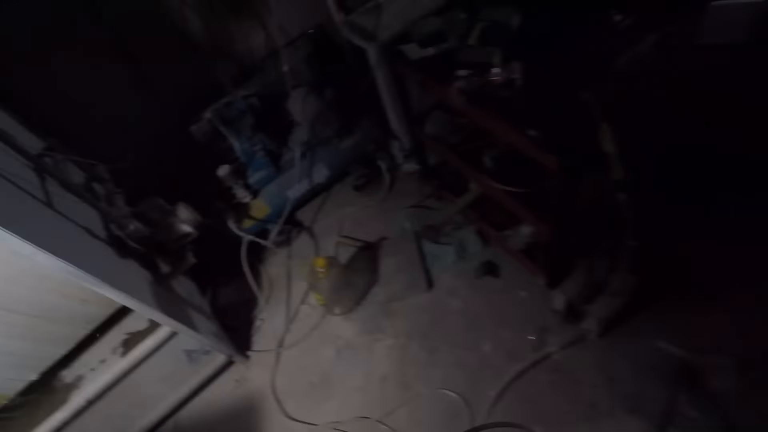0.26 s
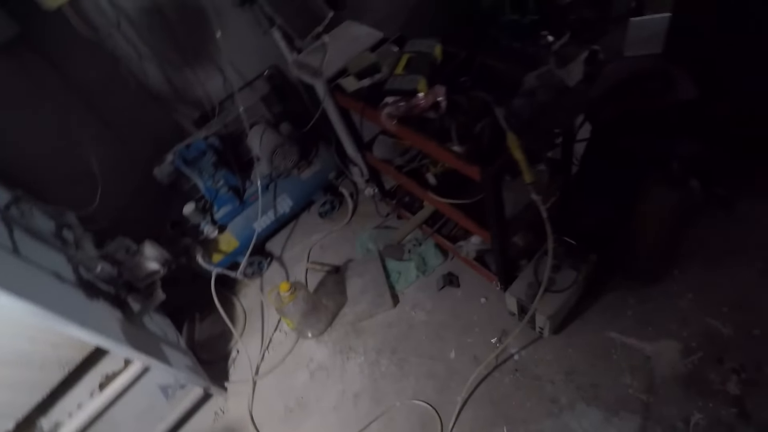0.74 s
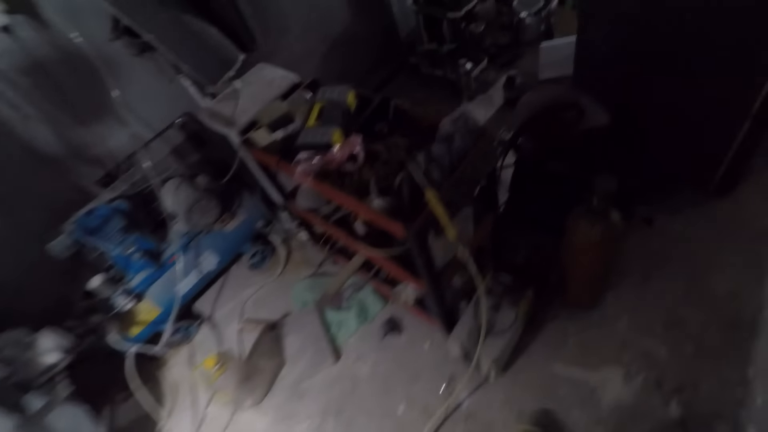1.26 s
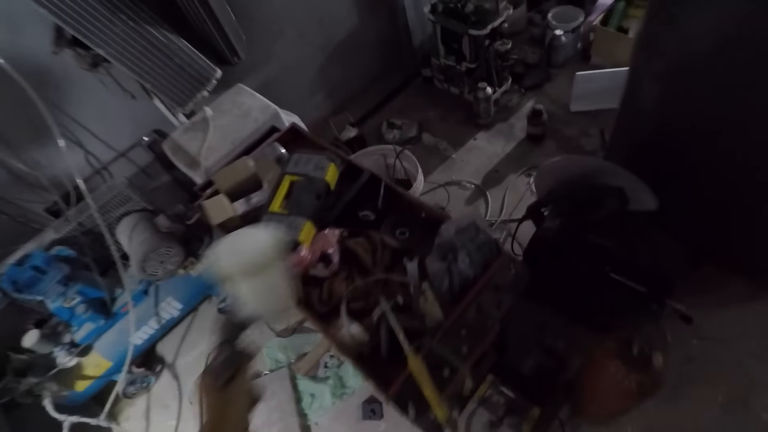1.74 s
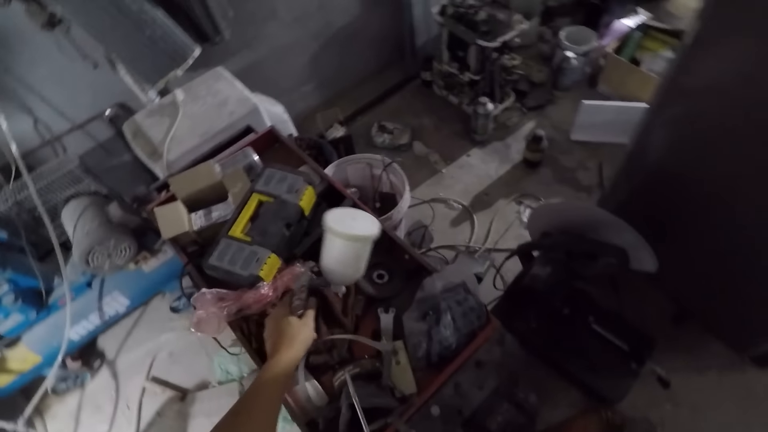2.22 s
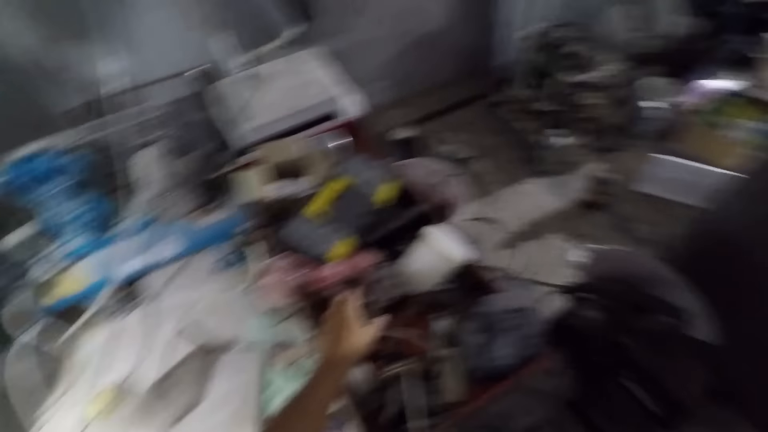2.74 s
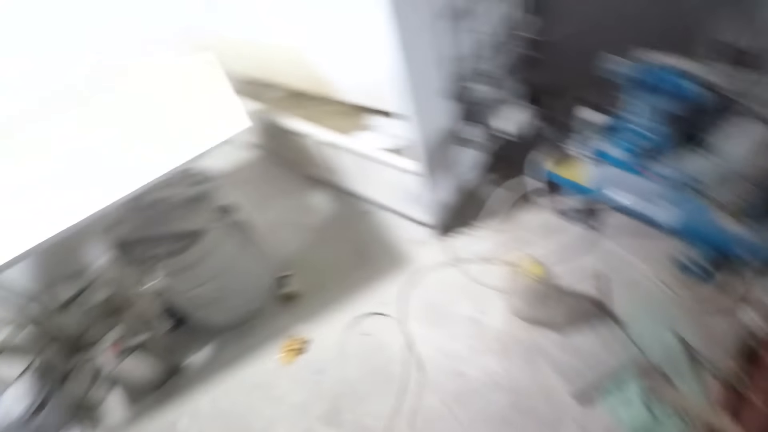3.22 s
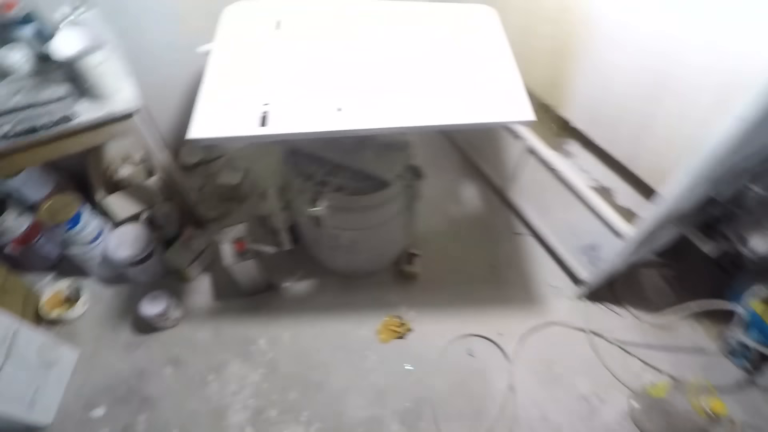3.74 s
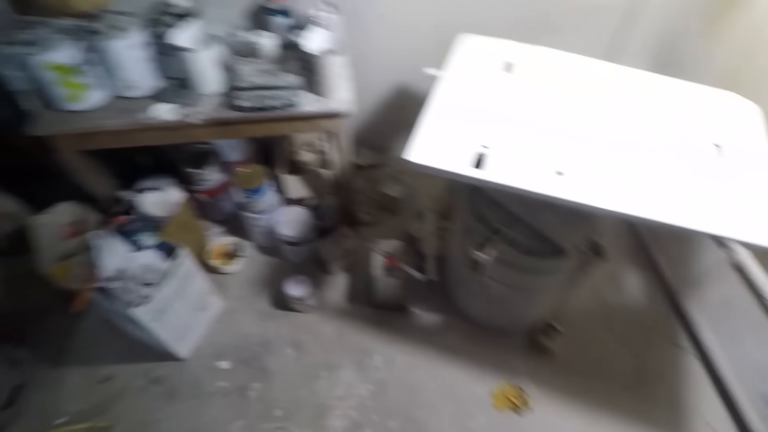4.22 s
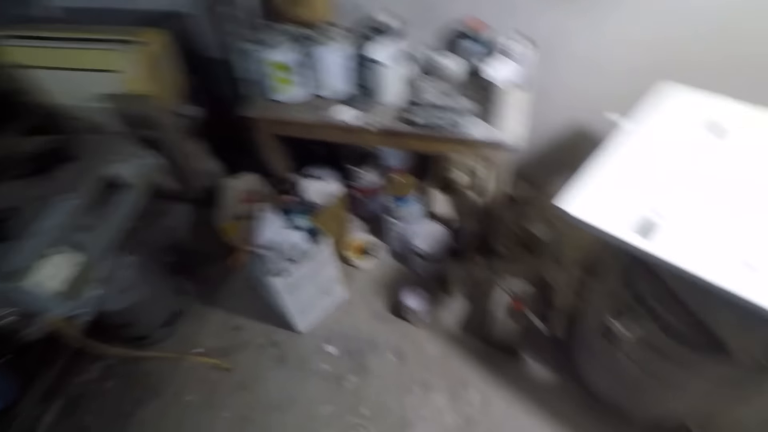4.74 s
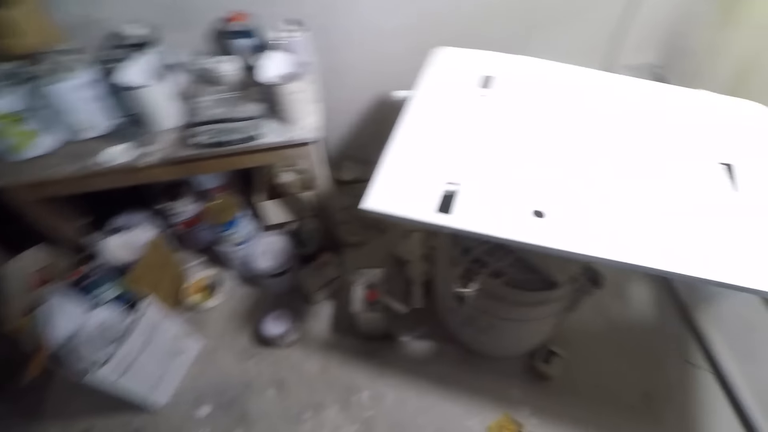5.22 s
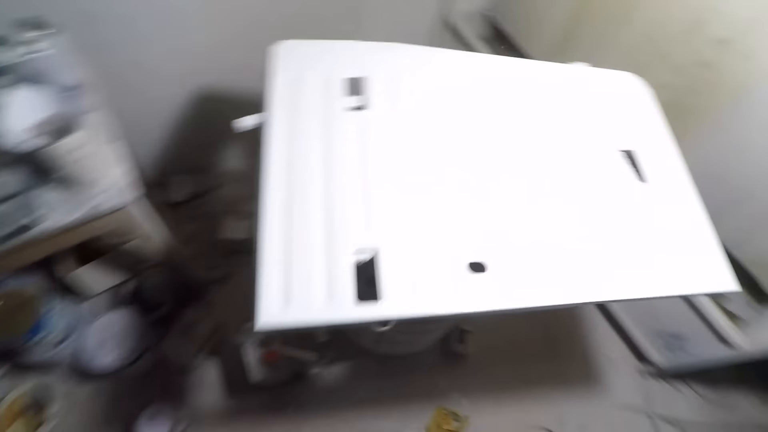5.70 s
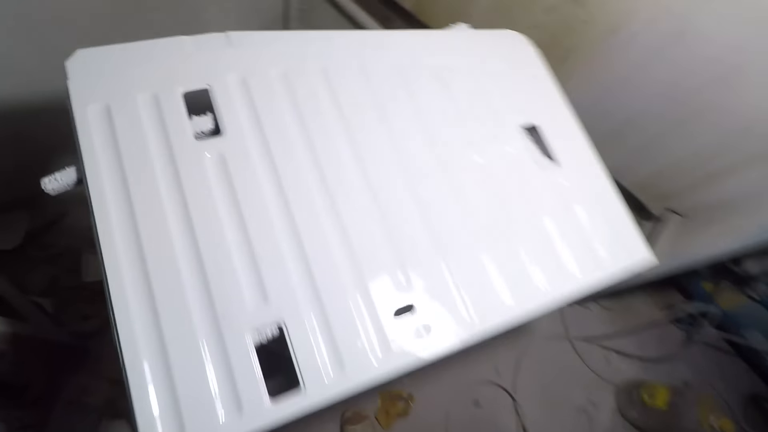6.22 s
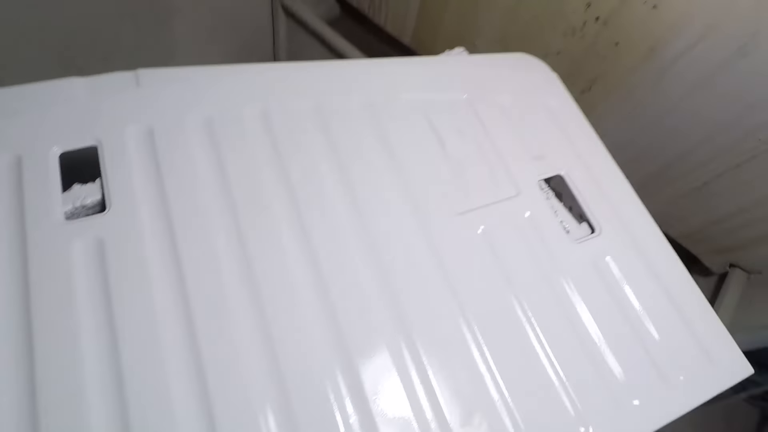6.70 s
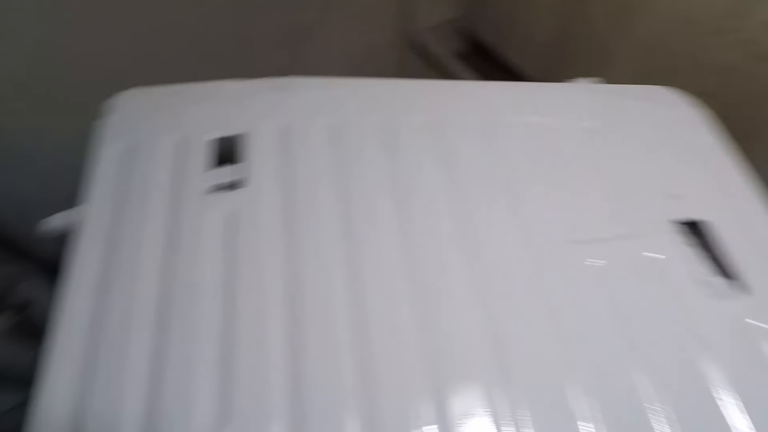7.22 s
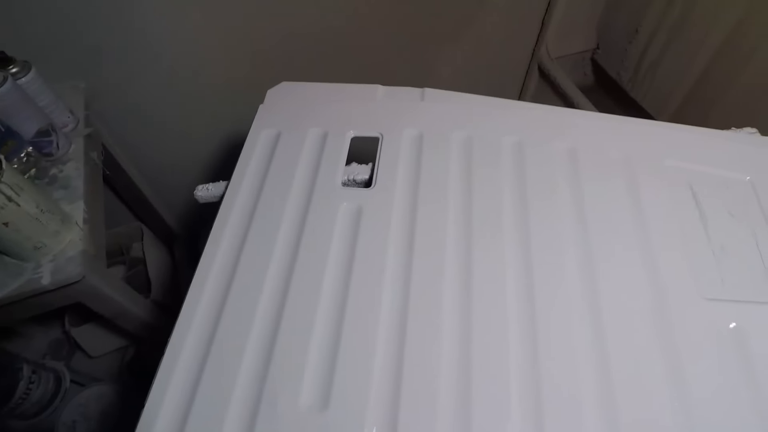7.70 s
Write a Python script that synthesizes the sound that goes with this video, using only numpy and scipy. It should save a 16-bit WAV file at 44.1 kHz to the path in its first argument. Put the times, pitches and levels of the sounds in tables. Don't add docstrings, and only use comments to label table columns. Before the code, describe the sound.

A piston air compressor is already running and continues unbroken for about eight seconds in a hard, reflective workshop. A dominant, very deep motor hum sits under a rapid pulsing drone, about seventeen strokes a second, with a hollow mid-pitched intake ring, clacking valves, thin metallic ringing and airy hiss. Brief pitch-bending swells of the ring slip in near 0.8 and 1.3 s, again around 3.5 to 3.7, and faintly near 5 and 5.75. A light tick at 1.5 s precedes hollow overlapping knocks and clatter from 1.9 to 2.2 s as a tool is set down; a faint click follows at 2.9. Bass rumble is fullest around 2 to 3 s, then thins. Shoes and hose scuff concrete throughout, most clearly from 4.7 to 5.6 s. Tones fade in and out as the moving microphone passes loud and quiet spots; after 6.6 s the upper drone is duller.

```python
import sys
import numpy as np
from scipy import signal
from scipy.io import wavfile
from scipy.ndimage import uniform_filter1d, minimum_filter1d

SR = 44100
rng = np.random.default_rng(int(sys.argv[2]) if len(sys.argv) > 2 else 0)


def file_out(sig):
    cols = np.atleast_2d(sig).T
    lim = np.clip(cols, -1, 1)
    pcm = np.round(lim * 32767).astype(np.int16)
    wavfile.write(sys.argv[1], SR, pcm)


def magnitude_from_level(level_db):
    exponent = np.asarray(level_db, float) / 20
    return 10 ** exponent


N = 351036
T = np.arange(N) / SR
PUMP_HZ = 17.215
BASS_FAR_DB, BASS_NEAR_DB = -30, -20
# time_s, hum_delay_ms, nearness to the tank corner (0-1), ring_peak_after_stroke_ms
WALK_PATH = [(0, -2.5, 0.6, 34.4), (.8, -4, 0.36, 29), (1.3, -2, 0.64, 30.7), (1.9, -1.3, 0.86, 33.7),
             (2.7, -0.4, 0.78, 36), (3.1, -1.2, 0.63, 29), (3.6, -2.5, 0.28, 27.9), (3.9, -2.5, 0.2, 29),
             (5, -3.5, 0.08, 28.1), (5.25, -3.5, 0.2, 28.7), (5.8, -2.5, 0.13, 31.4),
             (6.6, -4.5, 0.12, 31.7), (7.96, -3.5, 0.17, 36.2)]


def evened(x):
    return x / np.sqrt(np.mean(x ** 2) + 1e-20)


def curves(rows):
    s, *columns = np.transpose(rows)
    return [np.interp(T, s, c) for c in columns]


def read(points, hz):
    f, value = np.transpose(points)
    return np.interp(np.log(hz + 1), np.log(f + 1), value)


def drift(per_s):
    coarse_t = T[::256]
    coarse = 0
    for f in per_s * np.geomspace(.1, 1, num=8):
        coarse = coarse + np.sin(2 * np.pi * (f * coarse_t + rng.random())) / np.sqrt(f)
    return np.interp(T, coarse_t, evened(coarse))


def gate(start, length, edge_s, fall_s=None):
    t = T[::64]
    rise = np.tanh((t - start) / edge_s)
    fall = np.tanh((t - start - length) / (fall_s or edge_s))
    return np.interp(T, t, (1 + rise) * (1 - fall) / 4)


def fades(rows, edge_s=0.042):
    return sum(db * gate(s, length, edge_s) for s, length, db in rows)


def noise(spectrum, patchy_db, size=1024):
    hz = np.fft.rfftfreq(size, 1 / SR)
    a, b, patches = rng.standard_normal((4 * N // size + 5, len(hz), 3)).T
    patches = uniform_filter1d(patches, size=12, axis=0)
    patches = evened(uniform_filter1d(patches, size=10, axis=1))
    inside = (hz > spectrum[0][0]) & (hz < spectrum[-1][0])
    shape_db = np.where(inside, read(spectrum, hz), -120)
    z = (a + 1j * b) * magnitude_from_level(shape_db[:, None] + patchy_db * patches)
    return evened(signal.istft(z, nperseg=size, noverlap=3 * size // 4)[1][:N])


def resonate(x, hz, width):
    b, a = signal.iirpeak(hz, hz / width, SR)
    return signal.lfilter(b, a, signal.lfilter(b, a, x))


def line(turns, db, wander_db, wander_turns):
    level = np.sqrt(2) * magnitude_from_level(db + wander_db * drift(1.548))
    return level * np.cos(2 * np.pi * (turns + wander_turns * drift(1.5)))


def workshop():
    # pitch_hz, level_db per Hz
    rumble_colour = [(20, -2), (30, -2), (60, 2.2), (100, 4.5), (170, -4), (260, 3.5), (400, -2),
                     (520, 1.5), (600, -6.5), (700, -19.5), (800, -21), (1000, -22), (1500, -24.5)]
    # pitch_hz, level_db per Hz
    hiss_colour = [(1060, -17), (1800, -1.5), (2630, -4), (3590, -6.5), (4710, -8.5), (6330, -16),
                   (6620, -20), (8970, -20), (11000, -21), (14300, -52.5), (22000, -120)]
    middle_far_db, middle_near_db = -30.5, -19.5
    near = curves(WALK_PATH)[1]
    bass_db = BASS_FAR_DB + (BASS_NEAR_DB - BASS_FAR_DB) * near
    middle_db = middle_far_db + (middle_near_db - middle_far_db) * near
    rumble = noise(rumble_colour, 1.3, size=2048)
    bass, up_to_middle = (signal.sosfiltfilt(signal.butter(3, hz, fs=SR, output="sos"), rumble)
                          for hz in (128, 340))
    rumble += (magnitude_from_level(bass_db + 26.5) - 1) * bass
    rumble += (magnitude_from_level(middle_db + 22.5) - 1) * (up_to_middle - bass)
    throb = 1 + 0.047 * np.cos(2 * np.pi * PUMP_HZ * (T - .03))
    return magnitude_from_level(-24.0) * throb * rumble + magnitude_from_level(-46.0) * noise(hiss_colour, 1.4)


def scuffs():
    # start_s, length_s, level_db
    strokes = [(0.086, 0.19, -42), (0.714, 1, -46.5), (1.438, .12, -39), (1.884, 0.16, -40),
               (2.087, 0.078, -46), (2.198, 0.033, -38.5), (2.619, 0.51, -41), (3.08, 0.23, -39),
               (3.923, 1, -41.5), (4.7, 0.19, -33), (4.893, 0.36, -35), (5.308, 0.34, -34.5),
               (5.668, 0.26, -45), (6.538, 0.54, -43.5), (7.356, 0.21, -41.5), (7.68, 0.49, -42)]
    # pitch_hz, level_db per Hz
    rub_colour = [(760, -31.5), (1300, -3), (1960, -4.5), (3260, -0.5), (4080, -5.5), (5680, -7.5),
                  (6970, -20), (8960, -21.5), (11000, -32.5), (14300, -66.5), (22000, -120)]
    shuffle_db = -47.5
    unevenness = np.minimum(rng.exponential(1, N // 40 + 1), 4).repeat(40)[:N]
    grit = rng.standard_normal(N) * magnitude_from_level(4.6 * unevenness)
    grain = uniform_filter1d(abs(grit), size=60)
    power = magnitude_from_level(2 * shuffle_db)
    for s, length, db in strokes:
        power = power + magnitude_from_level(2 * db) * gate(s, length, 0.13 * length, .25 * length)
    return np.sqrt(power) * evened(noise(rub_colour, 1.1) * (1 + 0.44 * evened(grain)))


def knocks():
    # time_s, thud_db, thud_hz, thud_width (fading per second), clatter_db
    hits = [(1.451, -28, 700, 201, -36.5), (1.5, -43, 1100, 200, -32), (1.885, -8.5, 391, 39.6, -40.5),
            (1.91, -9, 291, 38.8, -32.5), (1.955, -17, 600, 59, -37), (2.0, -35, 760, 100, -35.5),
            (2.04, -23.5, 377, 60, -37), (1.93, -20, 228, 60, -32.5), (2.095, -11.5, 332, 40.2, -27),
            (2.151, -18, 294, 40, -37.5), (2.2, -27, 610, 100, -46), (2.93, -37, 880, 200, -33.5)]
    out, t = np.zeros(N), T[:6000]
    for s, thud_db, hz, width, clatter_db in hits:
        burst, clatter = rng.standard_normal((2, len(t)))
        thud = np.sin(2 * np.pi * hz * t) * np.exp(-t * width) * (1 - np.exp(-t / 0.0033))
        tail = np.exp(-t / .05) * (1 - np.exp(-t / .003))
        thud += .5 * evened(resonate(burst, hz, 6 * width)) * tail
        clatter = evened(resonate(clatter, 980, 1200) + 0.26 * resonate(clatter, 2800, 3100))
        clatter *= np.exp(-t / 0.006)
        out[round(s * SR):][:len(t)] += magnitude_from_level(thud_db) * thud + magnitude_from_level(clatter_db) * clatter
    return out


def valves():
    # pitch_hz, width_hz, delay after the stroke_s, loose rattle share, pair_half_split_hz
    plates = [
        (1120, 150, .019, 1.5, 50),
        (1620, 170, .013, .5, 70),
        (1600, 120, .013, .3, 0),
    ]
    # pitch_hz, width_hz, level_db
    thin_parts = [(4744, 16, -58.5), (8870, 30, -69), (12170, 40, -69), (923, 13, -55.5), (679, 6, -53)]
    # pitch_hz, level_db per Hz
    reed_colour = [(6650, -46), (11300, -2.5), (11700, -0.5), (12500, 3), (13100, -4.5), (14100, -6.5),
                   (15000, -13.5)]
    facing = {"low": [(-.3, 1.3, -6.5), (3.95, 2, 3), (6.2, 1.3, -2.5), (7.1, 1.2, 3.5)],
              "high": [(-.3, 1.6, 4.5), (2.85, 0.76, 4.5), (3.9, 0.74, 2)], "cover": [(-.3, 0.99, -5),
              (2.95, .65, 11), (3.8, 1.2, -7.5), (5, 0.31, 3)], "reed": [(2.9, 2.9, 2.5)],
              "low rings": [(.5, 0.77, 3.5), (1.4, .5, -2.5), (4.7, 3.6, -1.5)], "rings": [(.7, 1.1, 3),
              (2.1, .7, 5.5), (3.4, 2, -1), (5.9, 2.2, -3)]}
    turn_db = {part: fades(rows, .1) for part, rows in facing.items()}
    plates_db = (-46.5 + turn_db["low"], -49 + turn_db["high"], -53.5 + turn_db["cover"])
    reed_db = -55.5 + turn_db["reed"]
    out = np.zeros(N)
    for (hz, width, delay, loose, split), db in zip(plates, plates_db):
        turns = (T - delay) * PUMP_HZ
        swell = np.exp(-(((turns + .5) % 1 - .5) / .18) ** 2)
        ring = 0
        for f in (hz - split, hz + split):
            locked = round(f / PUMP_HZ) * turns
            ring = ring + magnitude_from_level(0.84 * drift(0.55)) * np.cos(2 * np.pi * (locked + 0.27 * drift(1)))
        rattle = evened(resonate(rng.standard_normal(N), hz, width))
        out += magnitude_from_level(db - 1.5) * evened(swell * ring + loose * (.6 * swell + .5) * rattle)
    since = ((T - .025) * PUMP_HZ) % 1
    strength = magnitude_from_level(2.5 * rng.standard_normal(200))[(T * PUMP_HZ + .5).astype(int)]
    puff = 0.69 + 1.9 * strength * since / 0.19 * np.exp(-since / .15)
    for hz, width, db in thin_parts:
        ring_db = db + turn_db["rings" if hz > 6000 else "low rings"] + 1.2 * drift(3.1)
        ring = evened(resonate(rng.standard_normal(N), hz, width))
        out += magnitude_from_level(ring_db) * np.sqrt(puff) * ring
    return out + magnitude_from_level(reed_db) * evened(puff * noise(reed_colour, 1.2))


def slips():
    # middle_s, level_db, top_hz
    skips = [(.785, -20, 599), (1.286, -21.5, 586), (3.491, -26, 560), (3.73, -23, 575), (5.031, -30, 634),
             (5.75, -25, 554)]
    out, from_hz = np.zeros(N), 380
    for s, db, top_hz in skips:
        arch = np.exp(-((T - s) / 0.0211) ** 2)
        turns = np.cumsum(from_hz + (top_hz - from_hz) * arch) / SR
        out += magnitude_from_level(db) * np.sqrt(2) * arch * np.cos(2 * np.pi * turns)
    return out


def pump():
    # multiple of the stroke rate, level_db
    low_orders = [(1, -45.5), (2, -36.5), (3, -41.8), (4, -35.4), (5, -47.0), (6, -29.8), (7, -35.3),
                  (8, -35.1), (9, -37.1), (10, -44.9), (11, -33.9), (12, -42.0), (13, -38.1), (14, -39.9),
                  (15, -38.8), (16, -40.5)]
    # pitch_hz, level_db
    intake_ring = [(344, -47), (396, -39), (430, -37.5), (448, -31.5), (465, -29.5), (482, -39.5),
                   (499, -23), (516, -20.5), (534, -29), (551, -28.5), (568, -48), (603, -55.5), (637, -45),
                   (689, -62.5)]
    spots = {"26": [(-.3, 1.47, 4.5), (1.3, 1.2, 0), (3.5, 0.79, 4), (5.5, .5, 0)], "28": [(.2, 0.98, -7),
             (1.3, 0.53, 4), (3.6, 4.7, 6), (5.4, 0.44, -14), (6.2, 2.1, 6.5)], "29": [(.3, 0.57, -1.5),
             (1.2, 0.53, 3), (1.72, .2, -21), (2.95, 0.27, -4.5), (3.9, 0.96, 0), (5, 0.84, -1),
             (6.9, 0.32, -4.5)], "30": [(-.3, 1.06, 3), (.79, 0.48, -10), (1.6, 1.42, 4.5),
             (3.5, 0.15, -1.5), (5, 0.65, -7.5)], "31": [(-.3, 1.56, 5.5), (1.35, .3, -24),
             (2.5, 0.64, -19), (3.75, 0.29, 6.5), (5.15, 0.49, -18)], "32": [(1.2, 0.15, 1),
             (2.85, 0.47, 6), (5.05, 0.39, -5)]}
    # start_s, length_s, change_db
    panel = [(6.62, 1.7, -14)]
    # start_s, length_s
    rebounds = [(0.793, 0.483), (3.488, 0.206), (5.12, 0.444)]
    # start_s, length_s
    echo = (1.4, .42)
    _, near, peak_ms = curves(WALK_PATH)
    bass_db = BASS_FAR_DB + (BASS_NEAR_DB - BASS_FAR_DB) * near + 24.5
    passing_db = {name: fades(rows) for name, rows in spots.items()}
    shadow_db = fades(panel, 0.18)
    split = sum(gate(s, length, .015) for s, length in rebounds)
    merge = gate(*echo, .06)
    out = np.zeros(N)
    for k, db in low_orders:
        order_db = db + 1.1 * bass_db * (2 < k < 10)
        out += line(round(k) * PUMP_HZ * T + rng.random(), order_db, 2.37, 0.03)
    for k in range(17, 41):
        if k == 27:
            continue
        fade_db = passing_db[str(min(max(k, 26), 32))] + shadow_db * (k > 29)
        slack = np.clip((abs(k - 29.5) - 1.5) / 7, 0, .7)
        turns = PUMP_HZ * (k * T - (k - 30) * peak_ms / 1000)
        turns += .055 * (k - 30) - np.arctan((k - 29.7) / 1.4) / (3 * np.pi)
        turns += .5 * (np.sinc(.4 * (k - 29.7)) < 0)
        turns -= split * np.clip((k - 29) / 4, 0, .5)
        turns += .3 * merge * (k == 30)
        turns += slack * rng.uniform(-.5, .5)
        out += line(turns, read(intake_ring, k * PUMP_HZ) + fade_db, 4.85 * slack, 0.38 * slack)
    return out


def motor():
    # multiple of the shaft rate, level_db
    shaft_orders = [(2, -40), (2.5, -45), (3, -38), (3.5, -37), (4, -41), (4.5, -40), (5, -31),
                    (5.5, -47.5), (6, -40), (7, -40.5), (9, -46.5), (10, -26.5), (15, -47)]
    shaft_spots = {"2": [(5.8, 2.1, 9)], "5": [(4.7, 1.2, 3)], "10": [(-.3, 1.18, -6.5), (1.6, 1.43, -10.5),
                   (3.3, .3, -11)], "15": [(-.3, 5.4, -7), (3.3, 1.8, 9.5), (6, 2.1, -1)]}
    shaft_hz = 46.57
    hum_far_db, hum_near_db = -9.5, -12
    delay_ms, near, _ = curves(WALK_PATH)
    turns = shaft_hz * (T - delay_ms / 1000)
    hum_db = hum_far_db + (hum_near_db - hum_far_db) * near
    out = np.sqrt(2) * magnitude_from_level(hum_db) * np.cos(2 * np.pi * turns)
    spot_db = {name: fades(rows, 0.12) for name, rows in shaft_spots.items()}
    for k, db in shaft_orders:
        out += line(k * turns + rng.random(), db + spot_db.get("%g" % k, 0), 1.2, .05)
    return out


def scene():
    return (workshop() + scuffs() + knocks() + valves() + slips() + pump() + motor())[None]


def low_pass(x):
    return signal.sosfilt(signal.butter(12, 15160, fs=SR, output="sos"), x)


def record(dry):
    notched = signal.lfilter(*signal.iirnotch(11150, 5, SR), dry)
    room_left = minimum_filter1d(np.minimum(.88 / (abs(notched) + 1e-9), 1), size=601)
    gain = uniform_filter1d(uniform_filter1d(room_left, size=300), size=300)
    return low_pass(gain * notched)


dry = scene()
out = record(dry)
file_out(out)
```